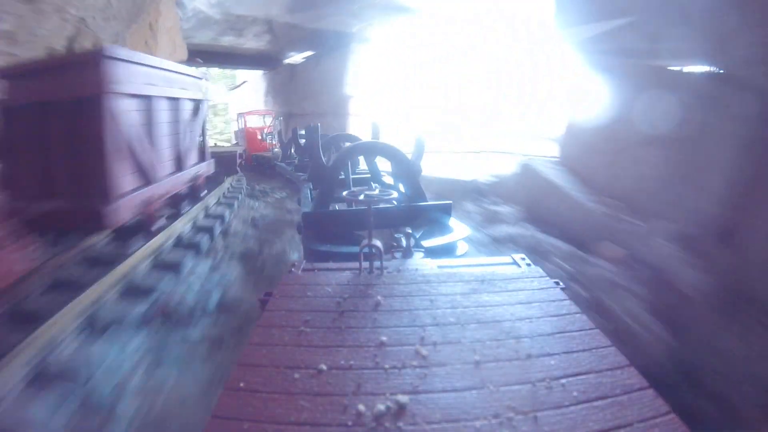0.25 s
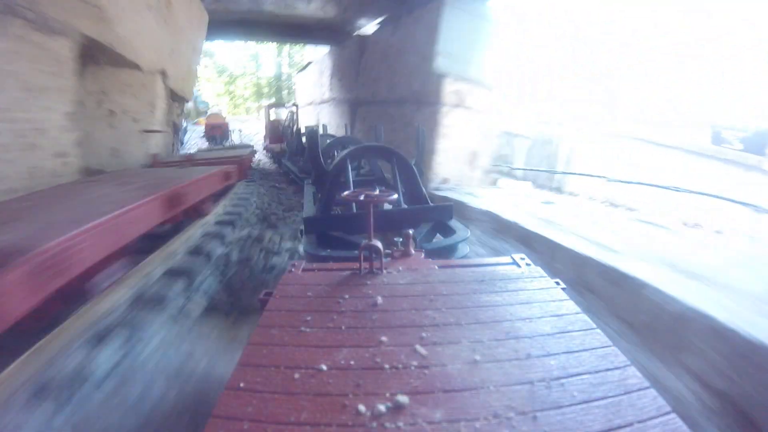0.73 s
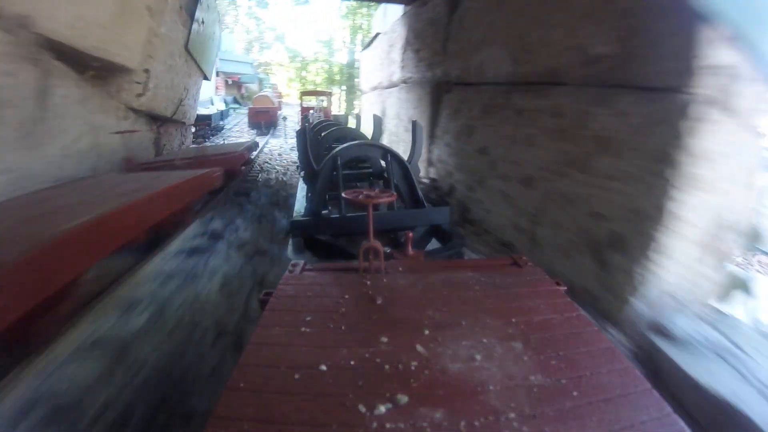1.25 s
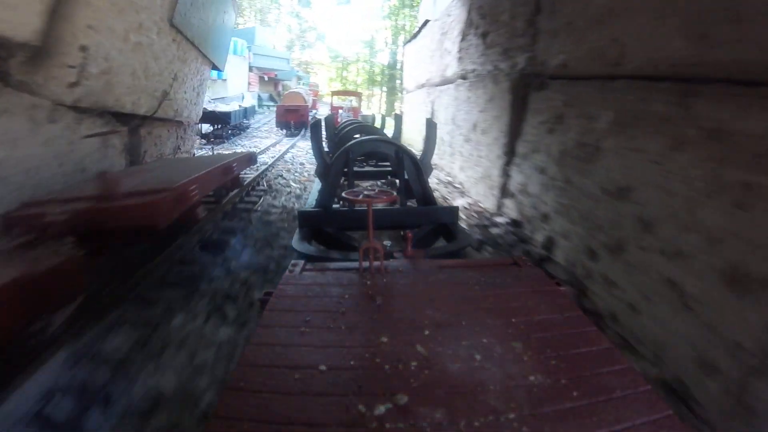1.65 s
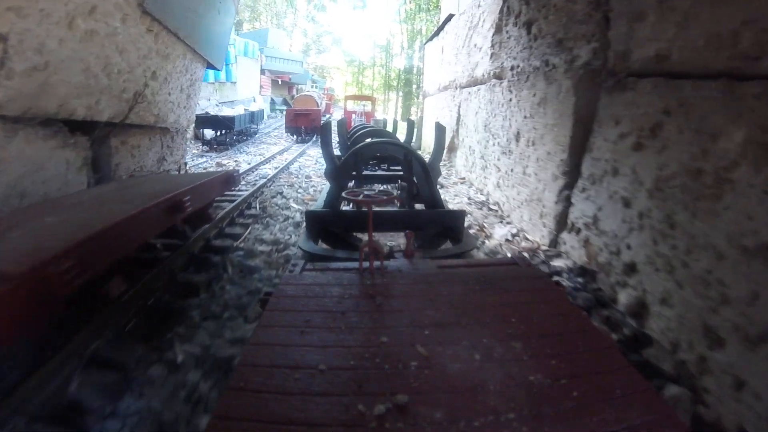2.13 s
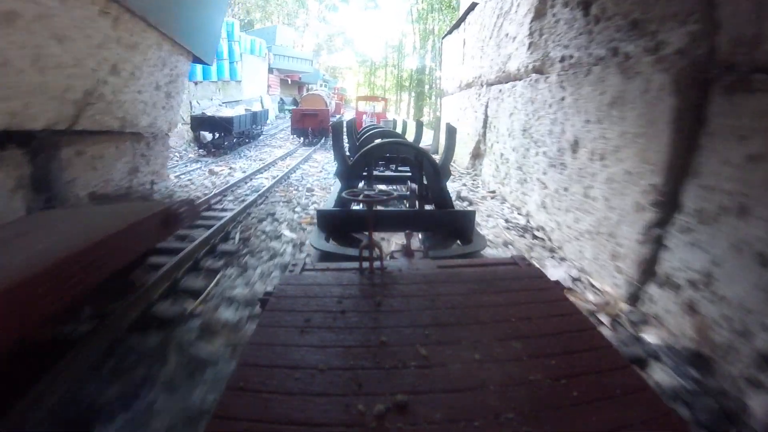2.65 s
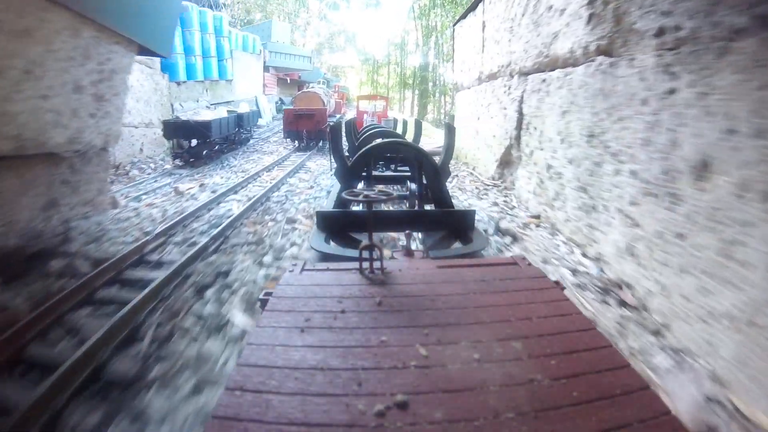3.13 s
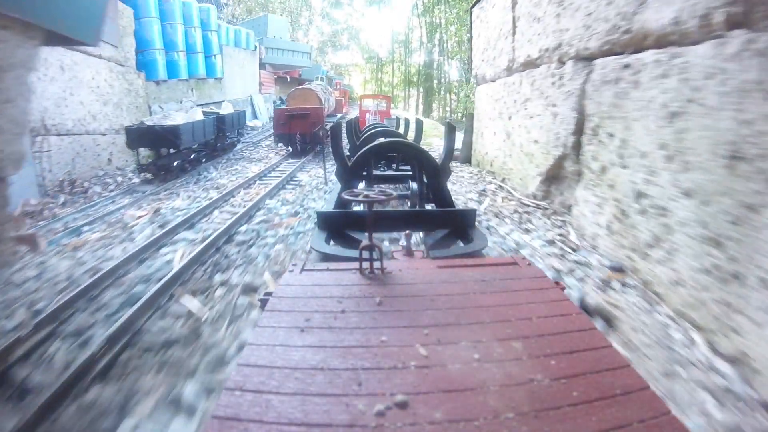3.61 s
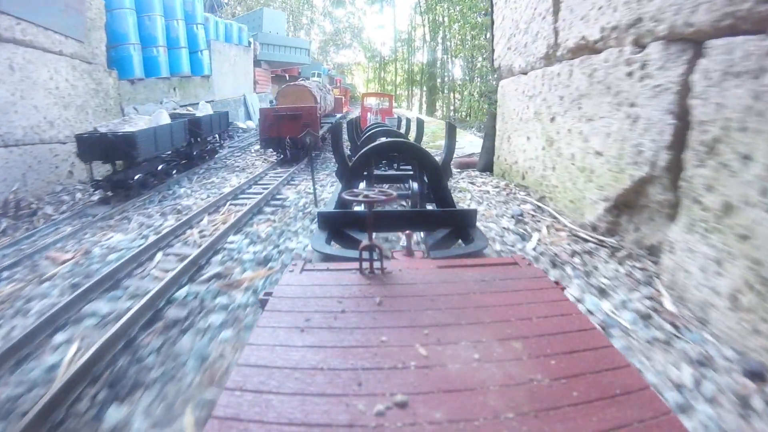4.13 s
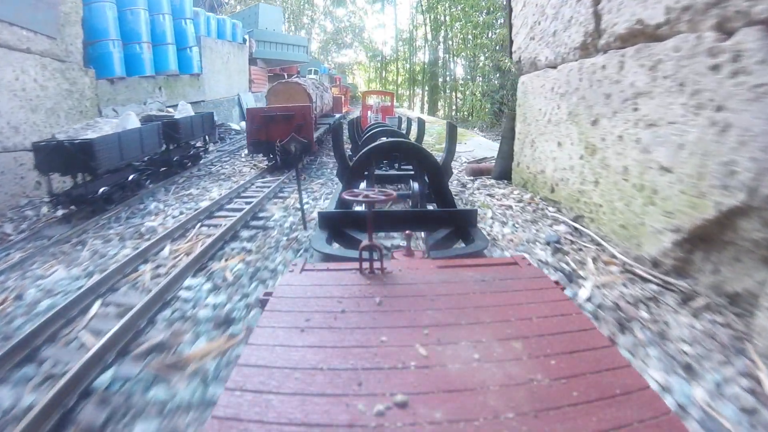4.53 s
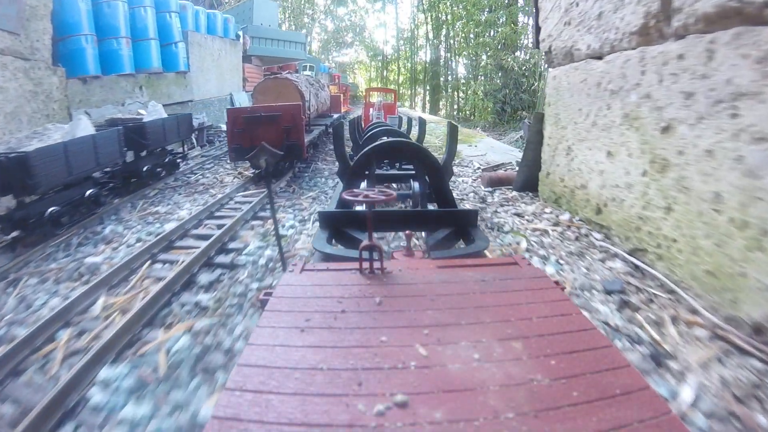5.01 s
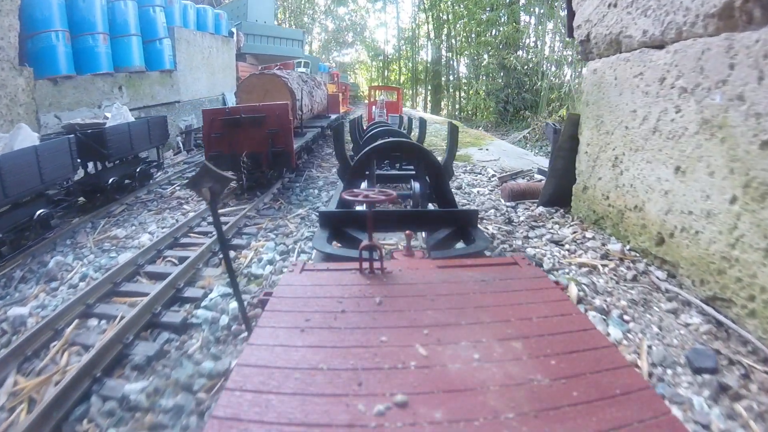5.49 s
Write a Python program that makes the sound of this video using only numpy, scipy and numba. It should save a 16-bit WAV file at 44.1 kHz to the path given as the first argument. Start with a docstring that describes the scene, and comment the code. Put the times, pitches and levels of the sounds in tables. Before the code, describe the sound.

A small wagon rolls along garden track throughout, heard close from a microphone in a sealed case on its deck. A low, wavering boom sits under a rough rumble, with faint metallic ringing and grinding from the wheels. For the first 1.5 seconds, rail joints thump the deck in quick, uneven succession while axles and couplings click, the sharpest clack at about 1.2 seconds. The rolling turns quieter and smoother around 2 seconds. Thumps and clicks return at 2.4 seconds, and the rumble swells into a hard jolt with a brief overload crackle near 2.9 seconds. The level dips for an instant after the loud jolts. Another cluster of thumps and clicks comes between 3.5 and 4 seconds. From there a loose axle ticks lightly and irregularly over the rumble and a few softer bumps, until the end at nearly 6 seconds.

```python
"""A small wagon rolls over garden track, heard from a camera in a sealed case fixed to its deck.
Wheel roughness shakes the deck (boom), the frame (rumble, roar) and the wheels (ring, grind).
Rail joints thump the deck and click the axles and couplings; late on, a loose axle ticks in its box.
The hardest jolt carries a brief overload crackle; the camera's gain control ducks after loud jolts."""
import sys
import numpy as np
from scipy import signal
from scipy.io import wavfile
from scipy.ndimage import uniform_filter1d
from numba import njit

SR = 44100
rng = np.random.default_rng(int(sys.argv[2]) if len(sys.argv) > 2 else 0)


def master_out(mix):
    """Clip the mix to full scale and print it as 16-bit PCM to the path in sys.argv[1]."""
    frames = np.transpose(np.atleast_2d(mix))
    ceiling = np.clip(frames, -1, 1)
    pcm = np.round(ceiling * 32767).astype(np.int16)
    wavfile.write(sys.argv[1], SR, pcm)


N = 253575

# modes of the wagon's frame, low to high: (pitch [Hz], width [Hz], level [dB])
FRAME_MODES = [(192.6, 116, 2), (391, 100, -4), (489.5, 85, 0.5), (594, 223, -8.5), (807.3, 129, 2.5),
               (882.4, 155, -2.5), (963.3, 150, -10), (1214, 230, -15.5), (1470, 190, -21.5)]
# modes of the box round a loose axle: (pitch [Hz], width [Hz], level [dB])
AXLE_BOX_MODES = [(1808, 160, 7), (2290, 290, -16)]


def undb(db):
    """Gain of a level in dB."""
    return 10 ** (np.asarray(db) / 20)


def unit(x):
    """Scaled to rms 1."""
    return x / np.sqrt(np.mean(x ** 2))


def curves(table):
    """One automation curve per column: straight lines between time points."""
    times, *columns = np.transpose(table)
    return [np.interp(np.arange(N) / SR, times, column) for column in columns]


def walk(rate):
    """Random levels held 1 / rate s and slewed twice; spread about 0.44."""
    hold = int(SR / rate)
    steps = np.repeat(rng.standard_normal(N // hold + 1), hold)
    return 0.594 * uniform_filter1d(uniform_filter1d(steps, hold), hold)[:N]


@njit
def svf(x, hz, width):
    """State-variable band-pass, gain 1 at a centre that may move."""
    y, band_state, low_state = np.empty(len(x)), 0., 0.
    for i in range(len(x)):
        centre = hz[i % len(hz)]
        g, damping = np.tan(np.pi * centre / SR), width / centre
        band = (band_state + g * (x[i] - low_state)) / (1 + g * (g + damping))
        band_state = 2 * band - band_state
        low_state += 2 * g * band
        y[i] = damping * band
    return y


@njit
def follow(x, attack, release):
    """Envelope follower with separate rise and fall rates."""
    y, level = np.empty(len(x)), 0.
    for i in range(len(x)):
        level += (abs(x[i]) - level) * (attack if abs(x[i]) > level else release)
        y[i] = level
    return y


def ring(x, modes):
    """A body of steep resonances, neighbours in opposite phase."""
    modes = [(np.atleast_1d(1. * f), 1.03 * w, db) for f, w, db in modes]
    return sum((-1) ** k * undb(db) * svf(svf(x, f, w), f, w) for k, (f, w, db) in enumerate(modes))


def flexing(modes):
    """Resonances of a body under shifting load: each drifts and swells on its own."""
    return [(f * (1 + .018 * walk(rate=6)), w, db + 3.5 * walk(rate=6)) for f, w, db in modes]


def strike(blow, modes):
    """Each mode rings up to its own peak level; the whole peaks at 1."""
    rings = (ring(blow, [(f, w, 0)]) for f, w, db in modes)
    out = sum(undb(db) * r / np.abs(r).max() for r, (f, w, db) in zip(rings, modes))
    return out / np.abs(out).max()


def roughness(rate, spread_db, grit_db, patchiness):
    """Smooth rail noise plus grains of grit under the wheels, in uneven patches."""
    size_db = spread_db * np.minimum(rng.exponential(size=N), 3)
    grit = (rng.random(N) < rate / SR) * undb(size_db) * rng.choice([-1, 1], N)
    return undb(patchiness * walk(30)) * (rng.standard_normal(N) + undb(grit_db) * unit(grit))


def deck_boom():
    """The deck keeps swinging at a wandering pitch on top of its random shaking."""
    # modes of the deck: (pitch [Hz], width [Hz], level [dB])
    deck_modes = [(35, 21, -5), (63.9, 45, 2), (100.2, 58.8, -5), (173, 69, -18)]
    # boom automation: (time [s], level [dB], swing pitch [Hz])
    automation = [(0.0, -19.5, 72.8), (0.32, -24.5, 83.7), (0.45, -25.5, 71.5), (0.75, -24.5, 76.1),
                  (0.96, -26, 55.76), (1.18, -23, 56.1), (1.25, -27, 66.6), (1.55, -27, 79.73),
                  (1.9, -25.5, 65.17), (2.37, -27, 89.1), (2.7, -20, 94.3), (3.36, -24, 55.26),
                  (3.63, -19.5, 67.5), (3.97, -24.5, 65.5), (4.11, -25, 74.6), (4.71, -22, 66.9),
                  (4.95, -21, 73.5), (5.01, -20, 83.5), (5.29, -20, 59.58), (5.75, -21.5, 71.6)]
    boom_db, swing_hz = curves(automation)
    swell = undb(4.5 * walk(12))
    pitch = swing_hz * (1 + 0.0799 * walk(24.93))
    swing = swell * np.sin(2 * np.pi * np.cumsum(pitch) / SR)
    shaking = undb(3 * walk(7.4)) * ring(rng.standard_normal(N), deck_modes)
    return unit(unit(shaking) + 0.71 * unit(swing)) * undb(boom_db)


def rolling(thumps):
    """Roughness shakes deck, frame and wheels, and loose axles rattle; jolts stir all but the boom."""
    # faders: (time [s], frame rumble [dB], frame roar [dB], wheel ring [dB], grind [dB], hiss [dB])
    faders = [(0.0, -39, -42, -40.5, -60.5, -76), (0.46, -36.5, -42.5, -42, -65, -96),
              (0.61, -35.5, -41, -40, -61, -89.5), (1.06, -41, -42.5, -41.5, -59, -88),
              (1.5, -43, -49, -48.5, -69, -95), (1.76, -44, -49.5, -55.5, -76, -89.5),
              (2.03, -52, -59.5, -60.5, -78.5, -84), (2.32, -53, -57, -60.5, -75, -82),
              (2.55, -42, -48.5, -54.5, -70, -78), (2.77, -41, -42.5, -47, -71, -78.5),
              (2.91, -35.5, -41, -47.5, -66, -74), (3.04, -47, -49.5, -55.5, -78, -86),
              (3.35, -46.5, -49, -54.5, -74, -86), (3.63, -37.5, -40.5, -47, -71, -80.5),
              (3.86, -41, -48, -50, -72, -78), (4.08, -45, -50.5, -54.5, -76.5, -86.5),
              (4.32, -43, -48.5, -52.5, -76, -83.5), (4.69, -37.5, -45.5, -50.5, -69.5, -78.5),
              (5.03, -41.5, -47.5, -51.5, -71, -79.5), (5.75, -46.5, -52, -57, -73, -78)]
    # the wheels' ring, grinding sizzle and top hiss, each: (pitch [Hz], width [Hz], level [dB])
    wheel_modes = [(1779, 130, -2), (1867, 407, -8), (2344, 430, -12.5), (2890, 714, -16.5)]
    sizzle_bands = [(4520, 620, -2.5), (4220, 1100, -7), (4800, 280, -4), (5600, 1400, -11.5),
                    (6500, 700, -19)]
    hiss_bands = [(6900, 650, 0), (8300, 2900, -5), (11100, 5100, -12.5)]
    rumble_db, roar_db, ring_db, sizzle_db, hiss_db = curves(faders)
    coarse = roughness(rate=300, spread_db=0.91, grit_db=-5, patchiness=4.9)
    fine = roughness(rate=250, spread_db=4.2, grit_db=-0.0038, patchiness=1.2)
    rattle = roughness(rate=55, spread_db=4.7, grit_db=11.2, patchiness=0.98)
    grind = roughness(rate=500, spread_db=3, grit_db=-3, patchiness=3.5)
    boom = deck_boom()
    push = coarse + 0.7 * fine + 0.17 * rattle
    rumble = unit(ring(push, flexing(FRAME_MODES[:4]))) * undb(rumble_db)
    roar = unit(ring(push, flexing(FRAME_MODES[4:]))) * undb(roar_db)
    axles = unit(ring(rattle, AXLE_BOX_MODES)) * undb(-7)
    wheels = unit(unit(ring(fine, flexing(wheel_modes))) + axles) * undb(ring_db)
    sizzle = unit(ring(grind, flexing(sizzle_bands))) * undb(sizzle_db)
    hiss = unit(ring(grind, hiss_bands)) * undb(hiss_db)
    shake = 1 + undb(-0.5) * uniform_filter1d(np.abs(thumps), size=int(0.03 * SR))
    return boom + shake * (rumble + roar + wheels + sizzle + hiss)


def joint_thumps():
    """The deck drops into a rail joint, springs back and dies out."""
    # jolts at the joints: (time [s], peak [dB], deck pitch [Hz], 60 dB decay [s])
    jolts = [(.003, -3, 76.6, 0.22), (0.171, -3.5, 76, 0.11), (0.289, -19, 70, 0.095),
             (0.428, -11, 65.03, 0.068), (0.487, -0.5, 75.8, 0.1), (0.642, -9.5, 98, 0.034),
             (0.812, -10.5, 86.9, 0.034), (0.827, -1, 62.6, 0.068), (1.123, -4.5, 52.5, 0.092),
             (1.238, -13.5, 77.4, 0.051), (1.273, -18, 69, 0.08), (1.403, -8.5, 76.6, 0.013),
             (2.38, -11.5, 54.32, 0.15), (2.413, -9, 85.4, 0.16), (2.752, -15.5, 84, 0.074),
             (2.784, -11, 83.55, 0.14), (2.818, -11, 93.8, 0.097), (2.89, -7.5, 77.75, 0.025),
             (2.914, 2.5, 63.07, 0.036), (3.595, -9, 69.6, 0.065), (3.621, -9, 69.87, 0.056),
             (3.694, -7.5, 62.16, 0.065), (3.765, -3.5, 61.37, 0.19), (3.843, -9.5, 57, 0.041),
             (3.9, -4, 54.52, 0.04), (4.052, -9, 63, 0.071), (4.511, -13.5, 77.07, 0.16),
             (4.638, -10.5, 57.8, 0.53), (4.888, -8.5, 71.74, 0.079), (5.28, -14.5, 64.38, 0.086),
             (5.429, -14.5, 65.2, 0.66)]
    out, t = np.zeros(N + SR), np.arange(SR // 2) / SR
    for s, db, hz, t60 in jolts:
        onset = 1 - np.exp(-(t * hz / 0.6) ** 2)  # the load arrives within the first cycle
        swing = -onset * np.sin(2 * np.pi * hz * t) * np.exp(-np.log(1000) * t / max(t60, .02))
        out[int(s * SR):int(s * SR) + len(t)] += undb(db) * swing / np.abs(swing).max()
    return out[:N]


def clicks_and_crackle():
    """Each click is a short scrape with a faint rattle that rings its own pitch, the case and frame."""
    # axle and coupling clicks; those at 2.9163 and 2.926 s play overload crackle on the hardest jolt:
    # (time [s], clack peak [dB], ring [Hz], then re the clack: ping [dB], crack [dB], knock [dB],
    # thud [dB])
    clicks = [(0.176, -12.5, 2470, -16, -20.5, -9.5, -7.5), (0.1805, -16.5, 1900, -22, -57, -18, -11),
              (0.4322, -26, 1820, -15, -24, -1.5, -6), (0.466, -28, 1870, -14, -34, -13, -23),
              (0.4935, -21.5, 1860, -14.5, -20, 2, -4), (0.5588, -27, 1890, -19, -29, -1, -9),
              (0.598, -27.5, 1900, -12.5, -20, -19, -34), (0.6272, -30, 1790, -19, -33, 1.5, -16),
              (0.646, -30.5, 1900, -10, -18, -24, -11), (0.675, -26, 1776, -20, -35, -17, -18),
              (0.7294, -26.5, 1840, -18.5, -40, -10, -23), (0.811, -35, 1880, -12, -20, -12, -11),
              (0.828, -18, 2250, -12.5, -23, -4, -19), (0.9323, -28, 1920, -18, -35, 2, 4.5),
              (0.9482, -30, 2530, -13, -22, 6, 7), (0.9848, -24.5, 2280, -12, -38, -3, 4.5),
              (0.992, -16, 2360, -19.5, -28.5, -1, -6.5), (1.005, -38, 1890, -12, -27, -21, -5),
              (1.037, -38.5, 1880, -7, -15, -13, -12), (1.103, -31.5, 1885, -21, -30, -15, 1),
              (1.1123, -29.5, 1940, -11, -25, -10, 7), (1.1269, -24, 2320, -7.5, -35, -2.5, 0.5),
              (1.1345, -19, 2360, -17, -30, -15, -7), (1.1641, -14, 2235, -3.5, -41, -23, -11),
              (1.1718, -7, 2290, -9, -54, -7, -9.5), (1.2141, -25.5, 2090, -12, -21, -9, -4),
              (1.268, -42, 1804, -6, -17, -9, -8), (1.276, -39, 1820, -3, -20, -13, -2),
              (1.3992, -25, 2000, -10.5, -18, 6.5, 4), (1.4208, -37, 1900, -17, -22, -18, -5),
              (1.4304, -30.5, 2130, -10.5, -24, -6, 2), (1.4391, -34, 1920, -16, -20, -19, -7),
              (1.709, -49, 2260, -6, -15, -6, -6), (1.8082, -26, 1810, -17.5, -23, -3.5, -0.5),
              (2.395, -18.5, 2250, -17.5, -19, 0, -3.5), (2.405, -17.5, 1800, -15, -43, -18, -29),
              (2.4127, -28, 2296, -20, -40, 0, 5), (2.4542, -34.5, 2320, -25, -48, -12, 10),
              (2.9163, -17, 1620, -15.5, -17, -7.5, -6), (2.926, -31, 2400, -11, -14, -9, -7),
              (2.9642, -17.5, 2420, -7, -38, -4, 6), (2.9726, -22, 1990, -30, -38, -4, -11),
              (3.058, -40, 2180, -20, -32, -8, -10), (3.068, -26, 2706, -14, -21, -2, -2),
              (3.0786, -31, 1810, -18.5, -29, -7, -8), (3.1056, -31, 2950, -29, -50, -20, -26),
              (3.1128, -19, 2180, -26.5, -46, -7, -36), (3.2381, -33.5, 2730, -18, -32, -2, -3),
              (3.4667, -23, 1787, -14, -17, -1, -9), (3.6592, -24, 2216, -14, -39, -22, 4),
              (3.7491, -32, 1810, -32, -30, -1, -6), (3.7695, -33.5, 1840, -9.5, -21.5, 6.5, 16.5),
              (4.386, -44, 2947, -18, -42, -2.5, -11), (4.8978, -32.5, 1838, -20.5, -28, -1.5, 3),
              (5.595, -42.5, 2860, -23, -39, -12, -13)]
    # the case's middle and bright modes, each: (pitch [Hz], width [Hz], level [dB])
    case_modes = [(1810, 400, -12.5), (2130, 2100, 4.5)]
    bright_modes = [(4400, 460, 0), (5350, 600, -8), (6400, 1700, 0), (9000, 2000, -18)]
    contact_s, scrape_s, rattle_s, push_s, ring_width_hz = .0003, .0022, .0084, .0012, 380
    t = np.arange(SR // 12) / SR
    scrape = (1 - np.exp(-t / contact_s)) * np.exp(-t / scrape_s)
    rattle = undb(-19) * np.exp(-t / rattle_s)
    # the shell of the case passes a middle band; the heavy frame answers only the slow part of a burst
    shell = signal.butter(3, (1600, 3100), "bandpass", fs=SR, output="sos")
    dull = signal.butter(4, 1000, fs=SR, output="sos")
    thud = strike(-t * np.exp(-t / push_s), FRAME_MODES[:2])
    out = np.zeros(N + len(t))
    for s, db, hz, *layers_db in clicks:
        noise = rng.standard_normal(len(t))
        burst = noise * (scrape + rattle)
        # the bright modes shift a little from click to click
        bright = [(f * (1 + .015 * noise[-1 - k]), w, lv) for k, (f, w, lv) in enumerate(bright_modes)]
        clack = strike(signal.sosfilt(shell, burst), case_modes + [(hz, ring_width_hz, 2)])
        ping, crack = strike(burst, bright[:2]), strike(burst, bright[2:])
        knock = strike(signal.sosfilt(dull, burst), FRAME_MODES[2:])
        click = clack + undb(layers_db) @ np.array([ping, crack, knock, thud])
        out[int(s * SR):int(s * SR) + len(t)] += undb(db) * click
    return out[:N]


def axle_ticks():
    """Single knocks of a loose axle ring its box."""
    # axle knocks: (time [s], peak [dB])
    knocks = [(4.0505, -41), (4.09, -38.5), (4.37, -37), (4.4568, -37.5), (4.5131, -38), (4.566, -42),
              (4.8204, -41), (4.858, -36), (4.945, -41), (4.959, -33.5), (5.0573, -43), (5.231, -39.5),
              (5.2594, -42.5), (5.2862, -45), (5.3693, -40), (5.4207, -41), (5.437, -39.5)]
    box_ring = strike(signal.unit_impulse(SR // 20), AXLE_BOX_MODES)
    blows = np.zeros(N)
    for s, db in knocks:
        blows[int(s * SR)] = undb(db)
    return signal.fftconvolve(blows, box_ring)[:N]


def scene():
    """The ride as heard inside the case, in mono."""
    thumps = joint_thumps()
    return (rolling(thumps) + thumps + clicks_and_crackle() + axle_ticks())[None]


def record(dry):
    """Gain control ducks after loud jolts; peaks are rounded, the top is cut."""
    attack_s, release_s, threshold, top_hz = .0084, .08, 0.19, 15700
    level = follow(dry[0], 1 / (attack_s * SR), 1 / (release_s * SR))
    gain = np.minimum(1, threshold / (level + 1e-9))
    rounded = 0.96 * np.tanh(dry * gain / 0.76)
    return signal.sosfilt(signal.ellip(8, .2, 70, top_hz, fs=SR, output="sos"), rounded)


dry = scene()
out = record(dry)
master_out(out)
```